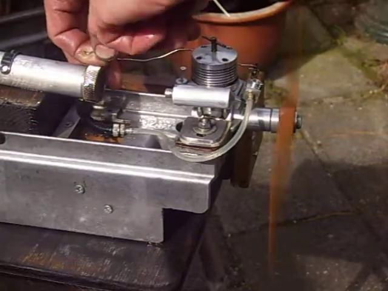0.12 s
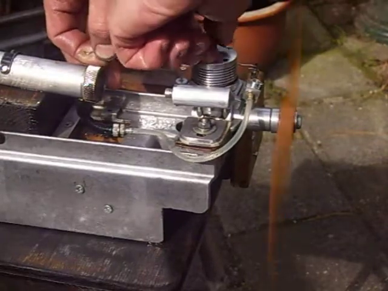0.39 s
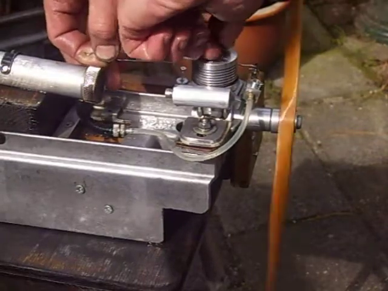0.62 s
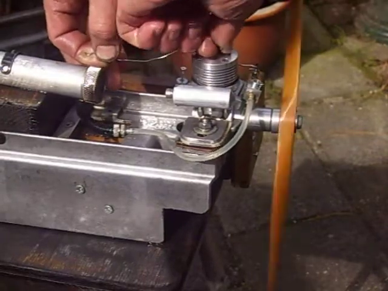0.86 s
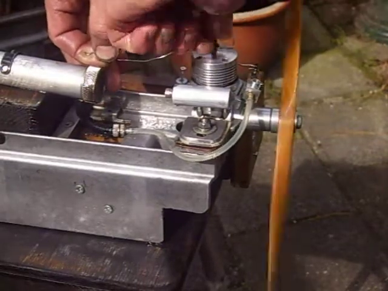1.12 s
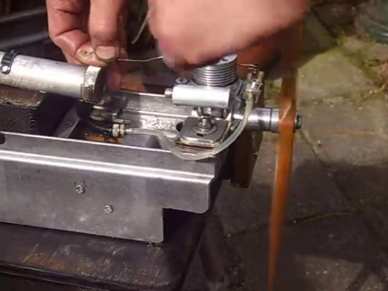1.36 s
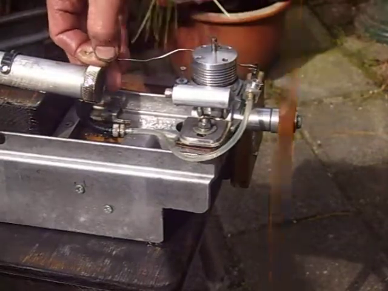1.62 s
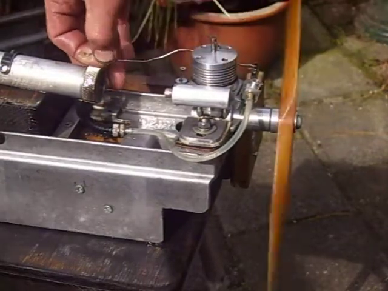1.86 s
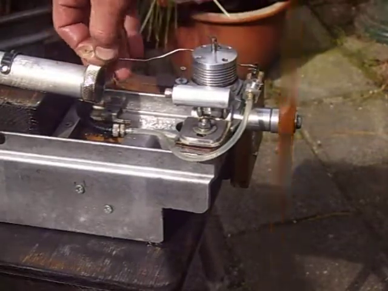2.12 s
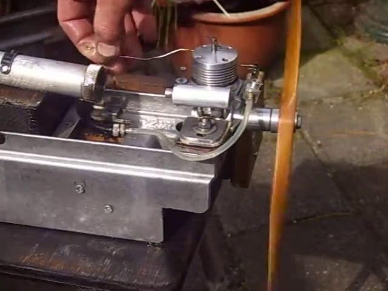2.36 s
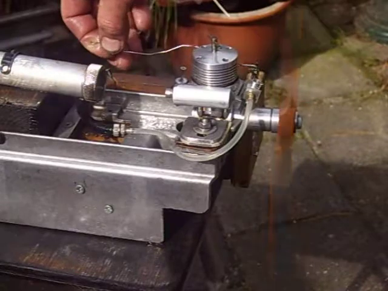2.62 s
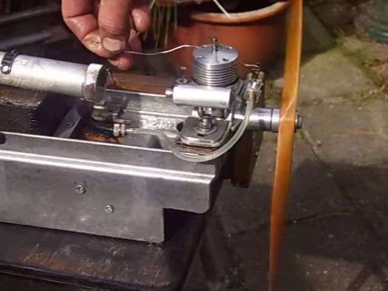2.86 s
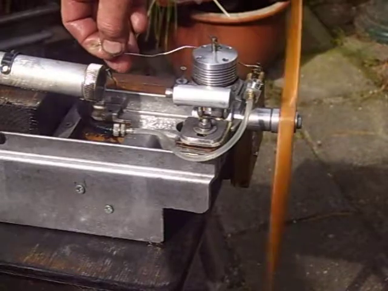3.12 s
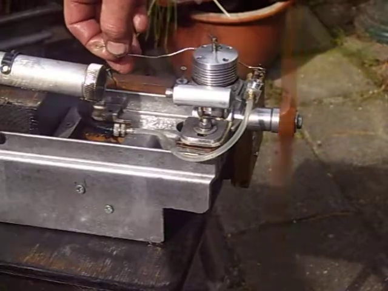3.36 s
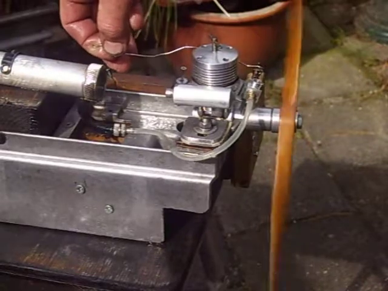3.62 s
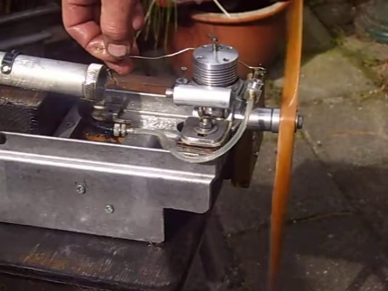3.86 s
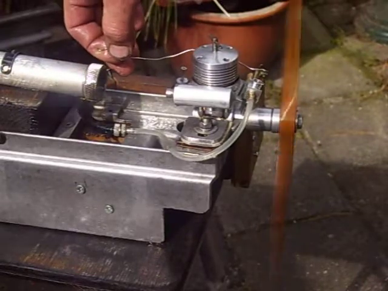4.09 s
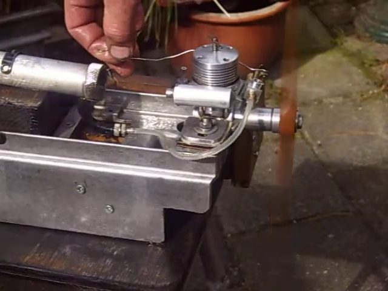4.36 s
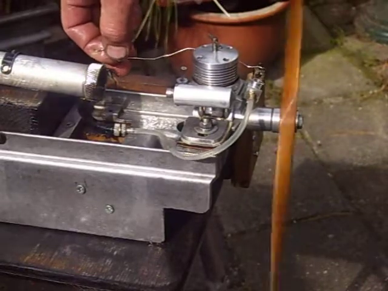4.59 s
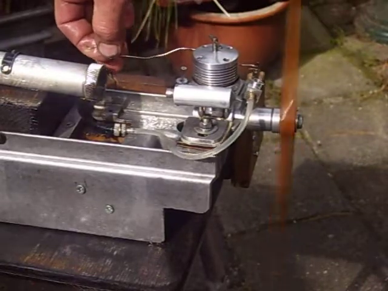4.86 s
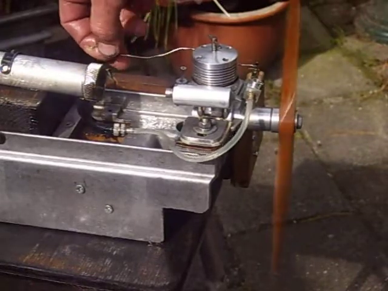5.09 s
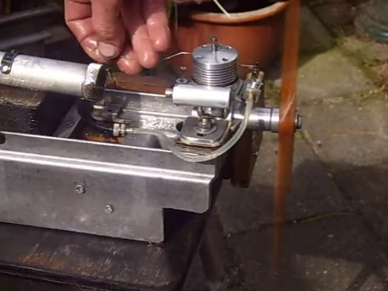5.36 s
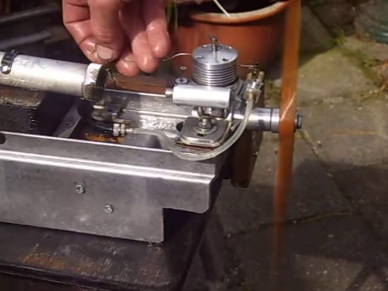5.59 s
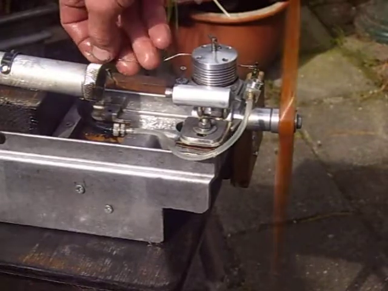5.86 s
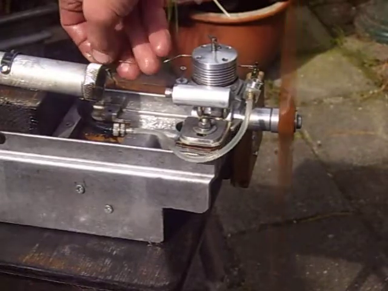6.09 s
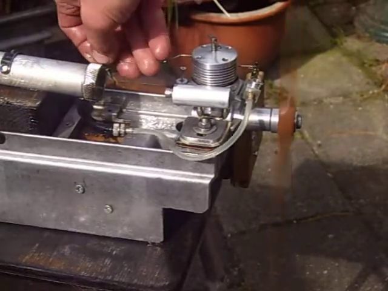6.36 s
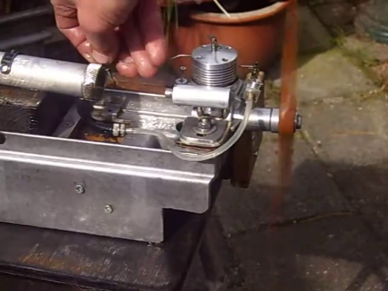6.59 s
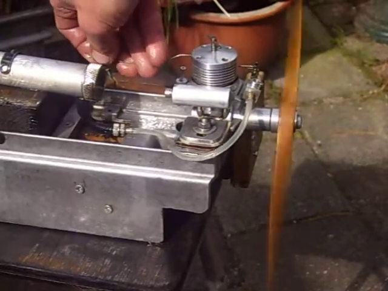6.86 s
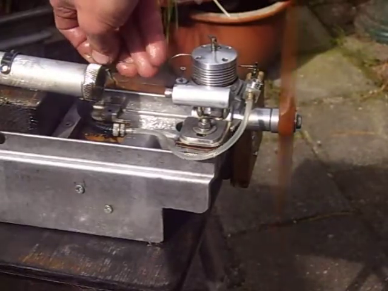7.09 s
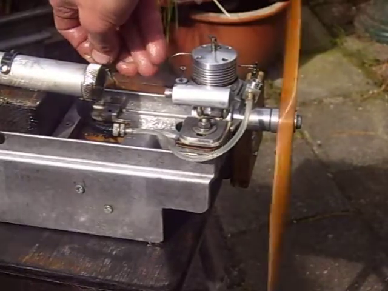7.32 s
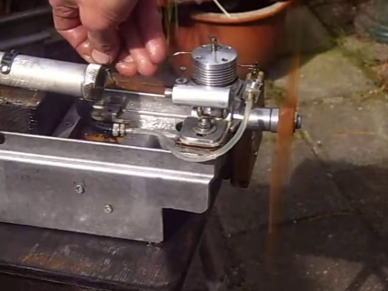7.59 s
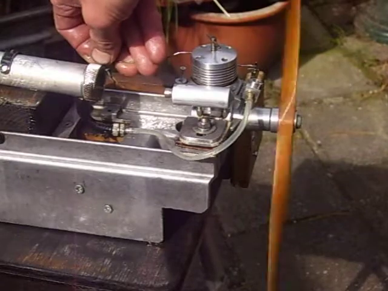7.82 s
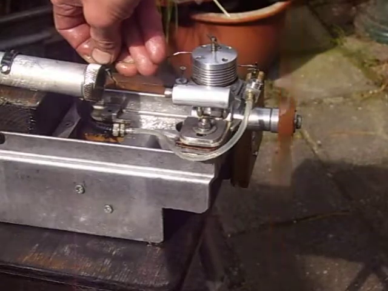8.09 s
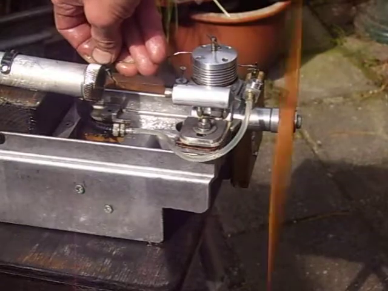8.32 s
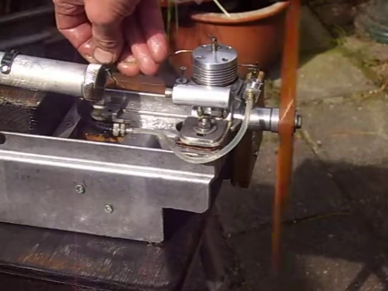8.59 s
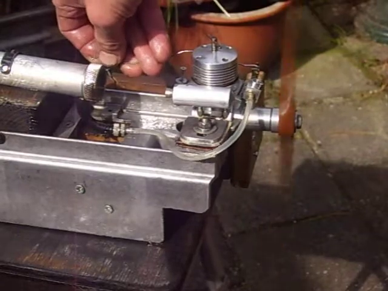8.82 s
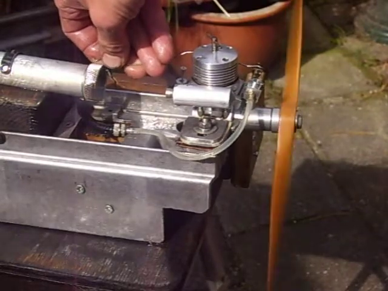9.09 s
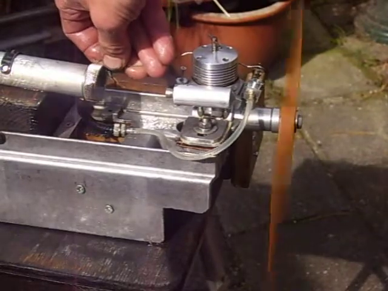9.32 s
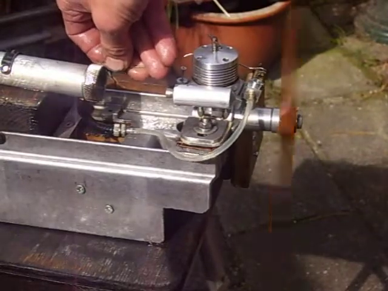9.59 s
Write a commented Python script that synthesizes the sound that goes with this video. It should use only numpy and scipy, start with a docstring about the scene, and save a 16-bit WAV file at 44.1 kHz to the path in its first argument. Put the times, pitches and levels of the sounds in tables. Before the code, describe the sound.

From the start a tiny single-cylinder propeller engine runs loudly beside a camera microphone in a paved yard, in mono with muffled top end. Exhaust beats, about seventy-four a second, fuse into a low, raspy, slightly uneven buzz, with midrange gas rush, metal stand rattle and light piston knock pulsing in step. Two very faint, dull low thumps at 0.5 and 1.2 seconds are almost buried. At 2.65 the engine surges, sags around 2.9, then from 3.1 climbs in pitch, growing louder and harder until a peak near 4.5, about a quarter faster than idle, knocking more sharply. Around 4.9 it falls quickly back to idle and holds with small wavers and a slightly changed tone. It dips a little after 8, then from 8.6 climbs again, rattling harder, and is still running fast when the sound ends around 9.5 to 10 seconds.

```python
"""Model engine in a paved yard

A small single-cylinder model engine runs on a metal stand in a paved yard, close to a camera's microphone. It
fires once a turn; it idles, surges, climbs to full speed, drops back and climbs again. Exhaust beats are sums
of shaft orders; filtered noise gives the gas rush, stand rattle and piston knock, all locked to the turn. Two
soft low thumps are short low sines under a bell-shaped envelope in the first seconds."""
import sys
import numpy as np
from scipy import signal
from scipy.fft import rfft, irfft, next_fast_len
from scipy.io import wavfile
from scipy.ndimage import uniform_filter1d

SR = 44100
rng = np.random.default_rng(int(sys.argv[2]) if len(sys.argv) > 2 else 0)


def to_wav(sig):
    """Store sig (one row per channel, or 1-D mono) as 16-bit WAV at the path in sys.argv[1].

    Samples outside -1..1 are clipped; the rate is SR.
    """
    pcm = np.clip(np.atleast_2d(sig), -1, 1) * 32767
    pcm = np.round(pcm).astype(np.int16)
    wavfile.write(sys.argv[1], SR, pcm.T)  # frames by channels


def amplitude_ratio(level_db):
    """Convert a level in decibels to the matching linear amplitude (field) ratio."""
    exponent = np.asarray(level_db, float) / 20
    return 10 ** exponent


N = 427769

# soft low thumps: (time [s], level [dB], frequency [Hz])
THUMPS = [(0.542, -47, 55), (1.242, -48, 50)]
# throttle moves: (start [s], speed it settles to [turns per s], travel [s])
THROTTLE_MOVES = [(0, 73.22, 0.01), (0.299, 73.5, 0.199), (0.598, 72.93, 0.05), (1.057, 73.42, 0.049),
                  (1.338, 73.92, 0.05), (2.35, 74.6, 0.25), (2.647, 87.52, 0.055), (2.895, 74.63, 0.031),
                  (3.102, 88.17, 0.054), (3.427, 86.94, 0.039), (3.715, 91.43, 0.079), (4.019, 92.42, 0.03),
                  (4.256, 94.02, 0.079), (4.443, 91.91, 0.253), (4.863, 74.9, 0.02), (5.149, 75.3, 0.15),
                  (5.429, 74.31, 0.1), (5.594, 75.41, 0.098), (6.265, 73.91, 0.257), (6.831, 74.5, 0.081),
                  (7.05, 74.03, 0.301), (7.66, 73.5, 0.101), (7.82, 74.44, 0.05), (7.985, 71.59, 0.527),
                  (8.612, 81.0, 0.289), (8.962, 86.98, 0.063), (9.249, 88.61, 0.298)]
# base loudness, shaped by the stand's resonances:
# (speed [turns per s], exhaust level [dB], rattle level [dB], knock level [dB])
LEVELS_BY_SPEED = [(72.5, -20.5, -30, -37), (72.8, -20, -34.5, -38), (74.04, -19.5, -32, -37.5),
                   (76.85, -17.5, -30, -34.5), (81.2, -20, -29, -35.5), (85.8, -18, -31.5, -37.5),
                   (87.2, -18, -30.5, -36), (90.9, -18, -30, -32.5), (92, -15.5, -29, -33),
                   (93.6, -14.5, -30, -29.5)]
# spectrum of the gas rush between the orders: (frequency [Hz], relative density [dB per Hz])
RUSH_SPECTRUM = [(30, -18), (100, -13.5), (250, -10), (500, -4.5), (800, -0.5), (1200, 1), (1700, -3),
                 (2300, -15.5), (3500, -10), (4400, -22.5), (7000, -22.5)]
# resonances of the rattling stand: (frequency [Hz], width [Hz], relative level [dB])
RATTLE_MODES = [(1634, 93, -9.5), (1987, 355, 0.5), (2268, 270, -3), (2704, 180, 0.5), (3053, 240, 6),
                (3390, 170, -16.5), (3835, 580, -9.5), (4190, 200, -16)]
# resonances of the piston knock: (frequency [Hz], width [Hz], relative level [dB])
KNOCK_MODES = [(4704, 340, -6.5), (5190, 420, -1.5), (5705, 250, -0.5), (6030, 340, -8), (6446, 280, -8.5),
               (6990, 660, -9.5)]
# exhaust beat in three idle colours, cruising and at full speed: (shaft order [-], relative level [dB])
EARLY_IDLE_ORDERS = [(1, -23.5), (2, -11), (3, -4.5), (4, -2), (5, -11.5), (6, -15.5), (7, -15.5), (8, -1),
                     (9, -2.5), (10, -7), (11, 2.5), (12, -12), (13, -6.5), (14, -3.5), (15, 0), (16, -6.5),
                     (17, -12.5), (18, -15), (19, -19.5), (20, -5), (21, -24.5), (22, -10.5), (23, -16),
                     (24, -35.5)]
MIDDLE_IDLE_ORDERS = [(1, -26.5), (2, -9), (3, -4.5), (4, -5.5), (5, -2), (6, -14.5), (7, -23.5), (8, -7),
                      (9, -4), (10, -4), (11, 2.5), (12, -9.5), (13, -11.5), (14, -3.5), (15, -5),
                      (16, -7.5), (17, -8.5), (18, -4.5), (19, -6), (20, -21), (21, -12), (22, -6.5),
                      (23, -8), (24, -24.5)]
LATE_IDLE_ORDERS = [(1, -22.5), (2, -8), (3, -2.5), (4, -3), (5, -2.5), (6, -11), (7, -12.5), (8, -6),
                    (9, -13.5), (10, -3.5), (11, 2), (12, -13), (13, -3.5), (14, -0.5), (15, -3.5), (16, 0),
                    (17, -2.5), (18, -3.5), (19, -6.5), (20, -4.5), (21, -7.5), (22, -25), (23, -16),
                    (24, -28.5)]
CRUISE_ORDERS = [(1, -22.5), (2, -1.5), (3, -1), (4, -7), (5, -9), (6, -2), (7, -0.5), (8, 1.5), (9, -4),
                 (10, -5), (11, -6.5), (12, -22), (13, -0.5), (14, -5), (15, -14), (16, -14), (17, -13),
                 (18, -7), (19, -20.5), (20, -35.5), (21, -18), (22, -14), (23, -13), (24, -12)]
FULL_ORDERS = [(1, -18.5), (2, -2.5), (3, -0.5), (4, -2), (5, -4.5), (6, 2.5), (7, -9.5), (8, 1.5),
               (9, 1.5), (10, -8), (11, -2.5), (12, -1.5), (13, -6), (14, -8), (15, -14.5), (16, -8.5),
               (17, -16.5), (18, -4), (19, -21), (20, -27), (21, -11), (22, -20), (23, -20), (24, -12.5)]
# idle tone drifting through its colours: (time [s], colour [0 early, 1 middle, 1.6 late])
IDLE_DRIFT = [(3.3, 0.58), (4.9, 1.12), (6.3, 1), (6.6, 1.6)]

IDLE_HZ, CRUISE_HZ, FULL_HZ = 74.5, 89.4, 91.94  # speeds of the exhaust states, turns per s
OPEN_FROM_HZ, OPEN_FULL_HZ = 75.5, 89  # throttle settings that count as shut and as open, turns per s
SPIN_UP_S, SPIN_DOWN_S, CHARGE_S = 0.121, 0.0552, 0.0291  # propeller speeding up, slowing; fuel charge
RUSH_DB = -13  # relative to the exhaust
OPEN_RATTLE_DB, OPEN_KNOCK_DB = 4.5, 7  # harder firing with the throttle open
PULL_RATTLE_DB, PULL_KNOCK_DB, PULL_EXHAUST_DB = 0.22, -0.02, 0.11  # per turn per s still to be gained
BAND_EDGE_HZ = 6760


def share(x, low, high):
    """0 below low, 1 above high, a straight ramp between."""
    return np.clip((x - low) / (high - low), 0, 1)


def evened(x):
    """Scales to rms 1."""
    return x / np.sqrt(np.mean(x ** 2) + 1e-20)


def wander(samples):
    """Slow chance of rms 1 that changes over the given number of samples."""
    size = max(int(samples), 1)
    smoothed = uniform_filter1d(rng.standard_normal(N), size)
    return evened(uniform_filter1d(smoothed, size))


def coloured(x, gain_of_hz):
    """Filters by a gain over frequency, then scales to rms 1."""
    size = next_fast_len(N)
    spectrum = rfft(x, size) * gain_of_hz(np.fft.rfftfreq(size, 1 / SR))
    return evened(irfft(spectrum, size)[:N])


def peaks(modes):
    """Gain over frequency of a set of steep resonances."""
    return lambda hz: sum(amplitude_ratio(db) / (1 + (2 * (hz - f) / width) ** 2) for f, width, db in modes)


def puff(turns, start, length, base):
    """Envelope of one burst a turn: start and length in turns, over a steady base."""
    u = (turns - start) % 1 / length
    return evened(base + u * np.exp(1 - u))


def per_turn(turns, spread_db):
    """One random gain for each turn: no two firings are equally strong."""
    index = np.clip(turns.astype(int), 0, None)
    return amplitude_ratio(spread_db * rng.standard_normal(2000)[index])


def thumps():
    """Short dull thumps: low sines under a bell-shaped envelope."""
    t = np.arange(N) / SR
    return sum(amplitude_ratio(db) * np.exp(-((t - s) / 0.025) ** 2) * np.sin(2 * np.pi * hz * (t - s))
               for s, db, hz in THUMPS)


def shaft():
    """The charge follows the throttle and the speed lags behind the charge, both in turns per s."""
    t = np.arange(0, N / SR + 0.01, 0.002)
    dt = t[1]
    setting = np.full(len(t), THROTTLE_MOVES[0][1])
    for start, hz, travel in THROTTLE_MOVES[1:]:
        setting += share(t, start, start + travel) * (hz - setting)
    rate = dt / CHARGE_S
    setting = setting[0] + signal.lfilter([rate], [1, rate - 1], setting - setting[0])
    speed = setting.copy()
    for k in range(1, len(t)):
        lag = SPIN_UP_S if setting[k] > speed[k - 1] else SPIN_DOWN_S
        speed[k] = speed[k - 1] + (setting[k] - speed[k - 1]) * (dt / lag)
    sample_t = np.arange(N) / SR
    return np.interp(sample_t, t, setting), np.interp(sample_t, t, speed)


def gas_rush(turns):
    """Noise of the escaping gas, swelling once a turn."""
    f, db = np.transpose(RUSH_SPECTRUM)
    noise = puff(turns, -0.12, 0.51, 0.76) * rng.standard_normal(N)
    return coloured(noise, lambda hz: amplitude_ratio(np.interp(np.log(hz + 1), np.log(f), db)))


def metal(turns, modes, start, length, base, locked, tick):
    """Moving parts strike in nearly the same pattern every turn, with loose scraping; the modes ring."""
    pattern = uniform_filter1d(rng.standard_normal((1000, 512)), size=22, axis=0).ravel()  # turn by angle
    strikes = evened(np.interp(turns * 512, np.arange(len(pattern)), pattern))
    scraping = np.sqrt(np.clip(1 - locked ** 2, 0, 1)) * 0.75 * rng.standard_normal(N)
    burst = (locked * strikes + scraping) * puff(turns, start, length, base)
    # one sharp main strike a turn, at the peak of the burst
    blow = evened(np.exp(-(((turns - start) % 1 - length) * 400) ** 2))
    force = (burst + tick * blow) * per_turn(turns - start + 1, 0.41)
    return coloured(force, peaks(modes))


def stand_rattle(turns, load, steady):
    """The metal stand shaken by the engine, more evenly under load."""
    return metal(turns, RATTLE_MODES, 0.9, 0.1021, 1.0, (0.74 + 0.21 * load) * steady, 0.16)


def piston_knock(turns, load, steady):
    """The piston's knock, later in the turn, more even and with a sharper strike under load."""
    return metal(turns, KNOCK_MODES, 0.2 + 0.65 * load, 0.0605, 0.65 - 0.23 * load,
                 (0.5 + 0.33 * load) * steady, 0.13 + 0.14 * load)


def exhaust(t, hz, turns, waver_db=2.5, slide_db=0.07, lean=0.64, spread=1.44, smear=0.34):
    """Shaft orders blended by speed; their phases start from a causal pulse with that spectrum."""
    frame_t, speed = t[::441], hz[::441, None]  # every 10 ms
    colour = np.interp(frame_t, *np.transpose(IDLE_DRIFT))[:, None]
    states = EARLY_IDLE_ORDERS, MIDDLE_IDLE_ORDERS, LATE_IDLE_ORDERS, CRUISE_ORDERS, FULL_ORDERS
    early_db, middle_db, late_db, cruise_db, full_db = (np.transpose(s)[1] for s in states)
    level_db = early_db + share(colour, 0, 1) * (middle_db - early_db)
    level_db += share(colour, 1, 1.6) * (late_db - middle_db)
    level_db += share(speed, IDLE_HZ, CRUISE_HZ) * (cruise_db - level_db)
    level_db += share(speed, CRUISE_HZ, FULL_HZ) * (full_db - level_db)

    orders = np.arange(1, level_db.shape[1] + 1)
    circle = np.hstack([level_db[:, :1], level_db, level_db[:, -2::-1]])  # spectrum with its mirror image
    phase = -signal.hilbert(np.log(amplitude_ratio(circle)), axis=1).imag[:, orders]
    phase += lean - spread * np.log(orders)  # the bass trails the crack
    phase += smear * np.minimum(orders - 6, 0) ** 2  # and is drawn out over the turn

    slow, quick, shake = rng.standard_normal((3,) + level_db.shape)
    waver = evened(uniform_filter1d(slow, size=20, axis=0))
    level_db += waver_db * np.sqrt(orders / orders[-1]) * waver
    level_db -= 10 * np.log10((amplitude_ratio(level_db) ** 2).sum(1, keepdims=True) / 2)  # rms 1

    # while the speed changes, orders slide through the yard's reflections and flicker
    sliding = abs(np.gradient(speed[:, 0], frame_t))[:, None] * share(orders, 2.0, 7.8)
    flicker = 0.5 - abs(evened(uniform_filter1d(quick, size=4, axis=0)))
    level_db += np.minimum(slide_db * sliding, 7) * flicker
    phase += np.minimum(0.012 * sliding, 1.1) * evened(uniform_filter1d(shake, size=3, axis=0))
    gain = amplitude_ratio(level_db)
    return sum(np.interp(t, frame_t, g) * np.cos(2 * np.pi * k * turns + np.interp(t, frame_t, p))
               for k, g, p in zip(orders, gain.T, phase.T))


def engine():
    """Exhaust, gas rush, rattle and knock, all driven by one shaft angle."""
    t = np.arange(N) / SR
    setting, hz = shaft()
    speeds, *columns = np.transpose(LEVELS_BY_SPEED)
    exhaust_db, rattle_db, knock_db = (np.interp(hz, speeds, c) for c in columns)
    opened = share(setting, OPEN_FROM_HZ, OPEN_FULL_HZ)
    pull = np.maximum(setting - hz, 0)  # speed still to be gained
    exhaust_db += PULL_EXHAUST_DB * pull
    rattle_db += OPEN_RATTLE_DB * opened + PULL_RATTLE_DB * pull
    knock_db += OPEN_KNOCK_DB * opened + PULL_KNOCK_DB * pull

    # uneven firing shifts the beat
    turns = np.cumsum(hz) / SR + 0.00089 * wander(830) + 0.005 * wander(4000)
    load = share(hz, IDLE_HZ, FULL_HZ)  # under load the parts strike more evenly
    speed_change = abs(uniform_filter1d(np.gradient(hz) * SR, size=2000))  # turns per s, per s
    steady = 1 - 0.27 * share(speed_change, 10, 55)  # speed changes shake the pattern loose

    beats = exhaust(t, hz, turns) * amplitude_ratio(0.22 * wander(700))
    out = amplitude_ratio(exhaust_db) * (beats + amplitude_ratio(RUSH_DB) * gas_rush(turns))
    out += amplitude_ratio(rattle_db) * stand_rattle(turns, load, steady)
    out += amplitude_ratio(knock_db) * piston_knock(turns, load, steady)
    return out


def scene():
    """The thumps and the engine, in one channel."""
    return (thumps() + engine())[None]


def band_limit(x):
    """A steep low-pass at the top of the band."""
    return signal.sosfilt(signal.butter(12, 7880, fs=SR, output="sos"), x)


def record(dry):
    """The camera's narrow band: a steep low-pass dulls the close sound."""
    low_pass = signal.butter(10, BAND_EDGE_HZ, fs=SR, output="sos")
    mix = signal.sosfilt(low_pass, dry)
    return band_limit(mix)


dry = scene()
out = record(dry)
to_wav(out)
```